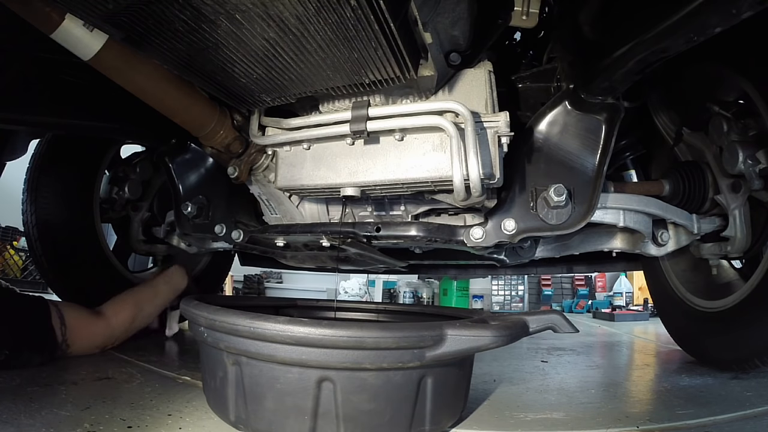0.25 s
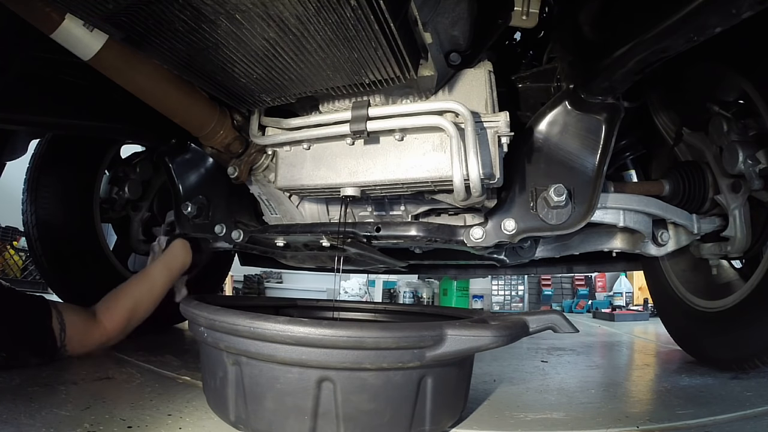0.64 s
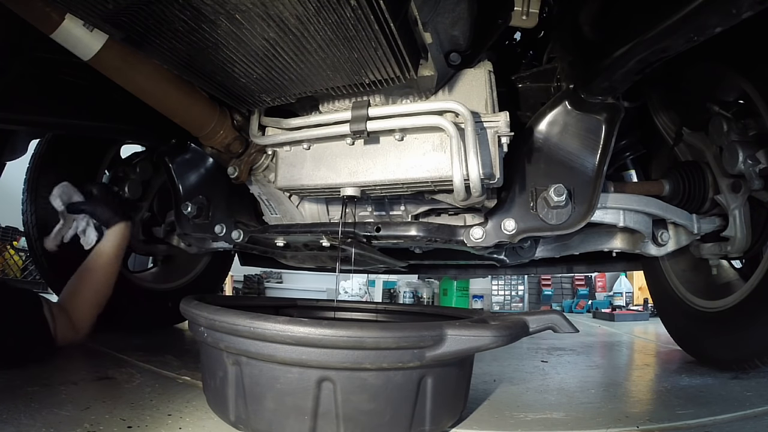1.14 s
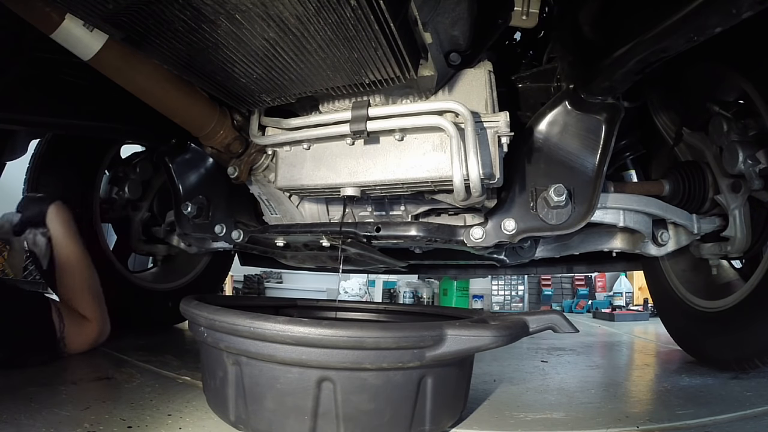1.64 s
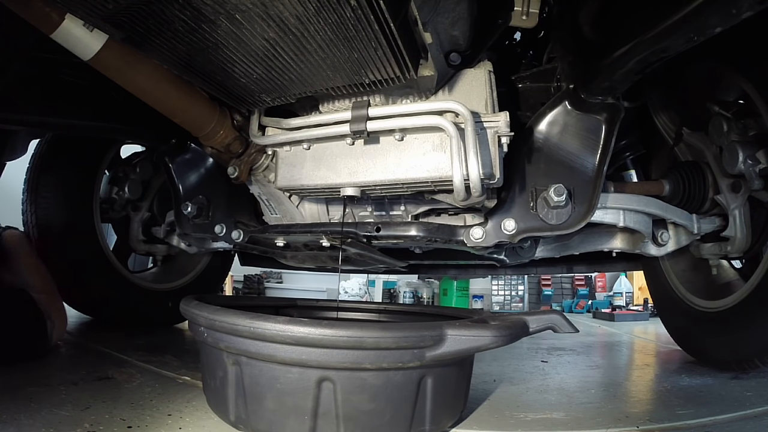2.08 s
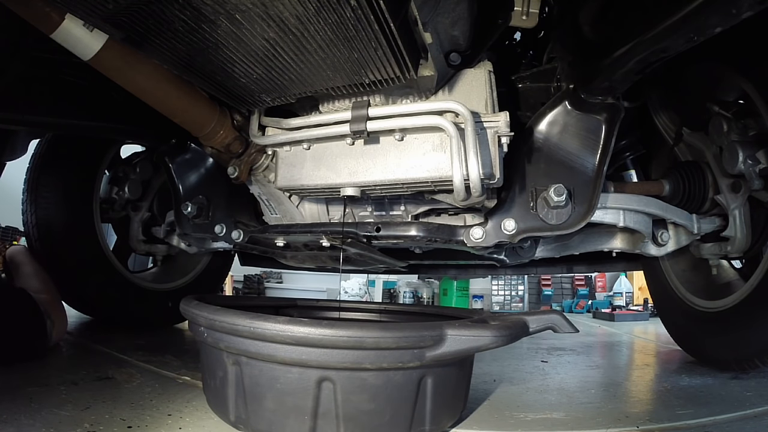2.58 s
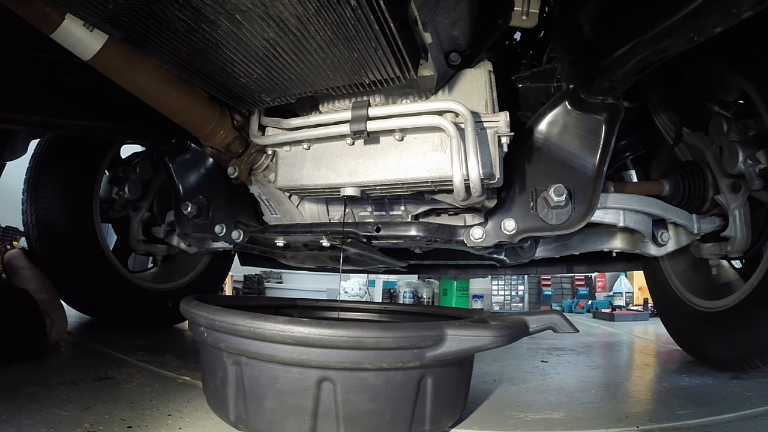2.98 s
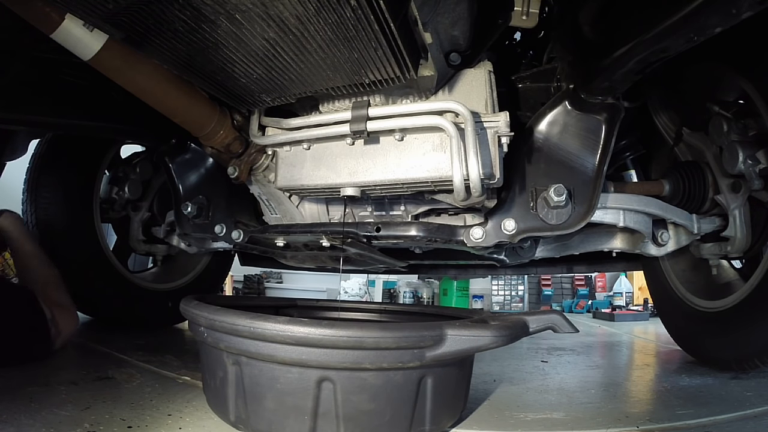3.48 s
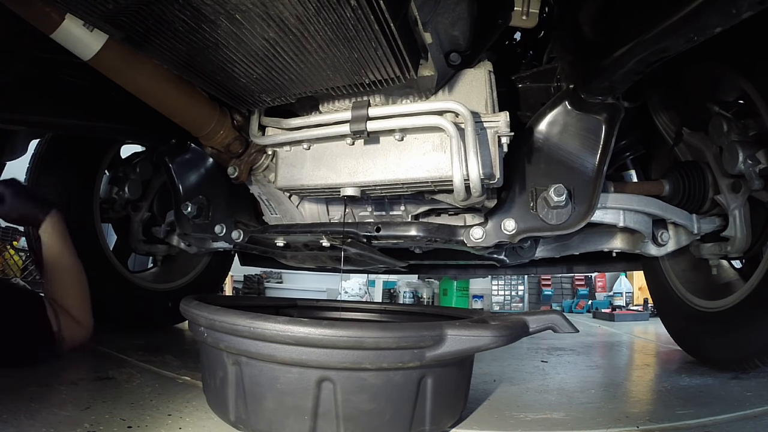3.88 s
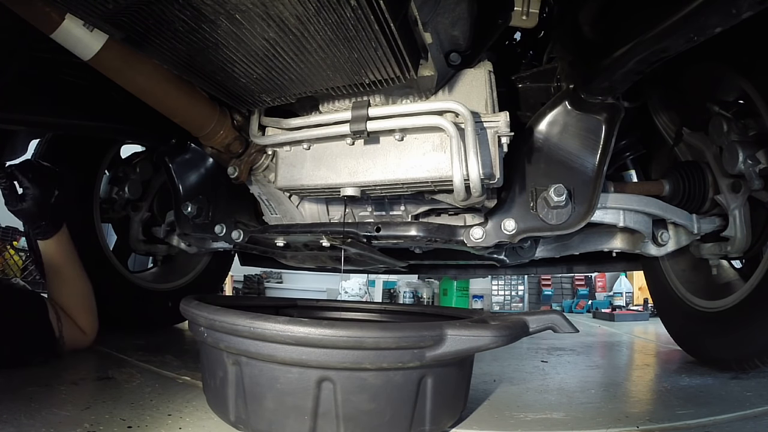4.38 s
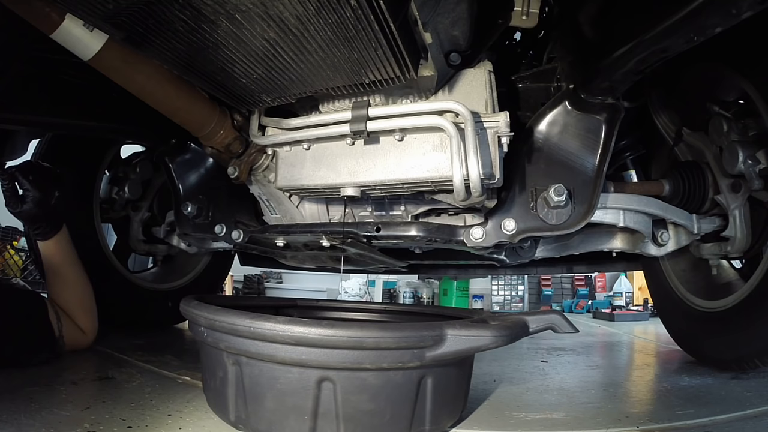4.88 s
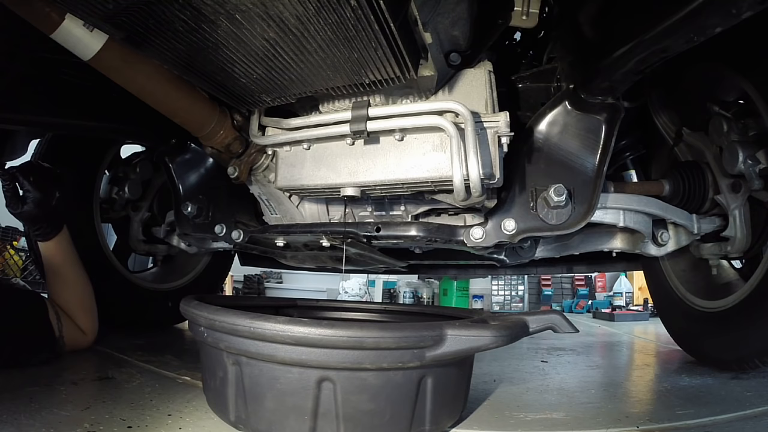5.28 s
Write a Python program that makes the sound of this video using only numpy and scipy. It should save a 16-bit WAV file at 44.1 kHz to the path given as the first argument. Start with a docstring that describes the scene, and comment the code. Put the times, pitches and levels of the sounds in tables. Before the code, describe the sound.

Close under a car, used oil runs in a thin stream into a plastic drain pan. It starts with sharp splats and plinks, thins briefly, then gurgles more, nearly dries to single drops around two seconds, and returns with hollow gulps. Low bumps and a muffled arm rub come mostly in the first second. Short boxy echo, quiet room air and uneven rumble; nearly centred.

```python
"""On a garage floor under a car, used engine oil runs from a sump into a plastic drain pan.
The thin stream swells and thins: swarms of decaying sine rings make its trapped bubbles gurgle and fizz.
Louder bubbles plink with rising pitch; drops splat as bursts of tiny rings over filtered noise.
The pan and underbody echo the oil. Someone moving makes low bumps and rubs over rumble and room air."""
import sys
import numpy as np
from scipy import signal
from scipy.fft import rfft, irfft
from scipy.io import wavfile

SR = 44100
rng = np.random.default_rng(int(sys.argv[2]) if len(sys.argv) > 2 else 0)


def store_wav(level_fs):
    """Save 16-bit WAV to argv[1]."""
    pcm = np.round(np.clip(np.atleast_2d(level_fs), -1, 1) * 32767)
    wavfile.write(sys.argv[1], SR, pcm.T.astype(np.int16))


N = 244002
TIME = np.arange(N) / SR


def undb(db):
    """Turn decibels into a gain to multiply by."""
    return 10 ** (np.asarray(db) / 20)


def unit(x):
    """Scale a signal so that its average strength (rms) is 1."""
    return x / np.sqrt(np.mean(x ** 2) + 1e-18)


def curve(table, t, axis=1):
    """Read one column of a table at times t, with straight lines between its rows."""
    rows = np.array(table)
    return np.interp(t, rows[:, 0], rows[:, axis])


def fade(t, t60):
    """Die away smoothly, 60 dB down after t60 seconds (at least 1 ms)."""
    return np.exp(-np.log(1000) * t / max(t60, 1e-3))


def opening(t, rise_s):
    """Rise smoothly from silence; rise_s sets how fast."""
    return 1 - np.exp(-t / rise_s)


def add(out, s, sound):
    """Mix a sound in, starting at s seconds."""
    i = int(np.clip(s * SR, 0, len(out) - 1))
    out[i:i + len(sound)] += sound[:len(out) - i]


def spaced(k, jitter, count):
    """Time in seconds of event k: evenly shared slots, with a random place inside each."""
    return (k + jitter) / count * N / SR


def colour(x, points):
    """Filter by an (f/Hz, level/dB) outline, scaled so that white noise keeps its power."""
    hz, db = np.transpose(points)
    bins = np.maximum(np.arange(len(x) // 2 + 1) * SR / len(x), 1)
    outline_db = np.interp(np.log(bins), np.log(hz), db)
    return irfft(rfft(x) * unit(undb(outline_db)), len(x))


def bubble(hz, t60, glide, swell):
    """A ring that opens over about swell cycles and fades; its pitch climbs by the share glide in t60."""
    t = TIME[:int(SR * t60) + 8]
    pitch = np.minimum(hz * (1 + glide * t / t60), SR / 2)
    wave = np.sin(2 * np.pi * np.cumsum(pitch) / SR)
    return wave * fade(t, t60) * opening(t, swell / hz)


# how strongly the stream runs, before each layer's gain: t/s, bubbling level/dB, fine spray level/dB
STREAM_FLOW = [(0.0, -48, -54), (.08, -58, -59.5), (0.15, -57.5, -61), (0.42, -60.5, -69),
               (.52, -62, -61.5), (.62, -60.5, -75), (0.75, -59, -60), (.85, -55.5, -65.5),
               (1.28, -56, -62), (1.46, -51, -55.5), (1.6, -56, -63.5), (1.71, -54, -59.5),
               (1.85, -57, -65), (2.06, -62, -66), (2.4, -60, -84), (2.76, -62.5, -78), (2.85, -55, -61.5),
               (3.03, -55, -59.5), (3.39, -54.5, -61.5), (3.74, -53, -59), (4.02, -53.5, -63.5),
               (4.26, -57.5, -63), (4.44, -52, -63), (4.68, -56.5, -67), (4.95, -56.5, -68),
               (5.2, -53, -65.5), (5.53, -54.5, -68)]
# starting pitch of the largest bubbles: t/s, f/Hz
LARGEST_BUBBLE = [(0, 1570), (.9, 1072), (1.45, 1310), (2.3, 1458), (2.95, 1140), (3.4, 1200), (4.2, 1414),
                  (4.8, 1548), (5.53, 1770)]


def trickle(count=3200, octaves=2.0, crowding=0.901, tilt_db=1.0, scatter_db=5.0, cycles=44,
            glide=0.041, gain_db=-4, swell=0.16):
    """The stream drags under a swarm of bubbles, from the largest size to smaller, higher ones."""
    out = np.zeros(N)
    when, size, strength, damping = rng.random((count, 4)).T
    times = spaced(np.arange(count), when, count)
    above = octaves * size ** crowding  # octaves over the largest bubble
    pitches = curve(LARGEST_BUBBLE, times) * 2 ** above
    gains = undb(tilt_db * above - scatter_db * np.log(strength + 0.055))
    decays = cycles * (.5 + damping) / pitches
    for s, hz, gain, t60 in zip(times, pitches, gains, decays):
        add(out, s, gain * bubble(hz, t60, glide, swell))
    return unit(out) * undb(curve(STREAM_FLOW, TIME) + gain_db)


FULL_FLOW_DB = -50  # reference bubbling level for a full stream


def churn(count=420, octaves=0.463, lowest=1.0, scatter_db=3, cycles=46, glide=0.072, swell=0.35,
          gain_db=-6, steepness=1.94):
    """Where the stream plunges in, big bubbles of similar size overlap; more flow makes them much louder."""
    out = np.zeros(N)
    for k, (when, size, strength) in enumerate(rng.random((count, 3))):
        s = spaced(k, when, count)
        hz = curve(LARGEST_BUBBLE, s) * lowest * 2 ** (octaves * size)
        gain = undb(-scatter_db * np.log(strength + 0.014))
        add(out, s, gain * bubble(hz, cycles / hz, glide, swell))
    flow_db = curve(STREAM_FLOW, TIME) - FULL_FLOW_DB
    return unit(out) * undb(FULL_FLOW_DB + gain_db + steepness * flow_db)  # steepness: dB per dB of flow


# gulps of a few like-sized bubbles, level before gain: t/s, middle f/Hz, level/dB, length/s
GULP_TIMES = [(1.11, 1210, -54, .05), (1.55, 1490, -49, .05), (1.715, 1280, -50.5, .04),
              (2.865, 1286, -52, .025), (2.918, 1243, -49, .06), (3.036, 1470, -50, .02),
              (3.095, 1500, -48.5, .06), (3.215, 1344, -44.5, .075), (3.325, 1120, -54.5, .02),
              (3.38, 1276, -46, .05), (3.43, 1396, -47, .05), (3.52, 1440, -51, .06),
              (3.635, 1540, -46.5, .06), (3.72, 1740, -50, .03), (3.77, 1310, -50, .05),
              (3.85, 1380, -50, .045), (4.18, 1510, -50, .04), (4.675, 1660, -53, .025),
              (4.865, 1665, -48.5, .035), (5.43, 1675, -49.5, .03)]


def gulps(count=6, gain_db=1.0, octaves=0.13, cycles=56, glide=0.043, swell=0.54):
    """The stream drags under bubbles in quick succession; they overlap into a short hollow gurgle."""
    out = np.zeros(N)
    for s, hz, db, length in GULP_TIMES:
        for k, (when, size) in enumerate(rng.random((count, 2))):
            pitch = hz * 2 ** (octaves * (size - .5))
            ring = bubble(pitch, cycles / pitch, glide, swell)
            add(out, s + length * (k + when) / count, undb(db + gain_db) * ring)
    return out


# small bubbles die sooner: fade time at a reference pitch, and the power of pitch by which it shortens
RING_T60_S, RING_HZ, RING_FALL = 0.035, 2000, 0.89
SLAP_DB, SLAP_T60_S, SLAP_OCTAVES = -16.5, .035, .27  # slap level before its fade; pitch spread each way


def plink(hz, glide=0.26, swell=0.2, slap_rise_s=0.000076,
          count=2, satellite_db=-18, satellite_s=.02, satellite_low=0.76, satellite_octaves=0.68):
    """A bubble quickly damped by the thick oil, born in a short wet slap and shedding weaker satellites."""
    def ring(f):
        """Let one bubble ring; the higher its pitch, the shorter it lasts."""
        return bubble(f, RING_T60_S * (RING_HZ / f) ** RING_FALL, glide, swell)

    t = TIME[:SR // 12]
    spread = 2 ** SLAP_OCTAVES
    band = [(hz / 8, -44), (hz / spread, -5), (hz, 0), (hz * spread, -8), (hz * 8, -44)]
    slap = colour(rng.standard_normal(len(t)), band)
    out = undb(SLAP_DB) * slap * fade(t, SLAP_T60_S) * opening(t, slap_rise_s)
    add(out, 0, ring(hz))
    for when, smallness in rng.random((count, 2)):
        satellite_hz = hz * satellite_low * 2 ** (satellite_octaves * smallness)
        add(out, when * satellite_s, undb(satellite_db) * ring(satellite_hz))
    return out


# the loudest single bubbles, level before gain: t/s, starting f/Hz, level/dB
LOUD_BUBBLES = [(0.1557, 6090, -30), (0.157, 5200, -37), (0.1914, 4930, -43.5), (0.233, 3770, -49),
                (0.236, 1470, -50), (.249, 2320, -48), (0.298, 1810, -38), (0.323, 1850, -50),
                (.354, 5270, -46.5), (0.3625, 2000, -45), (.501, 1456, -52), (0.682, 5440, -41.5),
                (0.783, 1760, -49), (0.8136, 1210, -43.5), (0.866, 2275, -41), (0.868, 1105, -46),
                (0.876, 5330, -42), (0.946, 1110, -46.5), (0.957, 1100, -43), (0.969, 4140, -40),
                (0.9983, 3980, -41.5), (1.078, 1610, -43.5), (1.092, 3250, -43), (1.0964, 1830, -44),
                (1.157, 2010, -40.5), (1.189, 3016, -37), (1.193, 3170, -38), (1.234, 1325, -41.5),
                (1.2338, 3750, -36), (1.234, 3270, -42), (1.263, 2010, -45), (1.293, 1820, -37),
                (1.348, 1766, -39), (1.362, 2080, -41), (1.377, 1270, -46), (1.435, 1370, -37.5),
                (1.456, 1406, -39.5), (1.44, 2160, -47), (1.478, 1480, -47), (1.488, 5180, -43.5),
                (1.498, 1920, -48), (1.517, 3450, -46), (1.589, 990, -49.5), (1.602, 1420, -48.5),
                (1.646, 1415, -45), (1.649, 2110, -46), (1.675, 2180, -38.5), (1.712, 3500, -48),
                (1.714, 4080, -42.5), (1.731, 2140, -50), (1.7729, 3660, -42), (1.853, 12600, -46),
                (1.866, 1250, -48), (1.894, 3780, -48.5), (1.919, 2350, -48), (1.928, 906, -50),
                (1.9826, 2100, -46), (2.017, 1675, -45), (2.19, 2067, -37.5), (2.205, 2050, -42),
                (2.341, 1860, -48), (2.4557, 2935, -37), (2.558, 13100, -45), (2.5675, 7230, -36.5),
                (2.568, 3600, -43), (2.575, 2490, -39), (2.61, 1605, -46), (2.611, 2020, -45),
                (2.8412, 2280, -43.5), (2.85, 5720, -33.5), (2.8667, 2210, -46), (2.8914, 4020, -46),
                (2.954, 1128, -46), (3.026, 2390, -42), (3.087, 4120, -44), (3.064, 5700, -40),
                (3.167, 2200, -50.5), (3.191, 5050, -42), (3.192, 3250, -44.5), (3.211, 2450, -44.5),
                (3.228, 5330, -40), (3.31, 5420, -41.5), (3.432, 3190, -52), (3.4568, 2300, -42.5),
                (3.492, 1420, -42.5), (3.492, 2130, -48), (3.578, 2290, -48), (3.607, 2980, -48),
                (3.641, 5320, -42.5), (3.693, 3070, -44), (3.723, 3780, -44.5), (3.767, 3080, -45),
                (3.789, 5640, -35.5), (3.855, 11900, -45.5), (3.8659, 2054, -46), (3.8854, 1430, -46),
                (3.9727, 1870, -42), (3.995, 3160, -42), (4.041, 2170, -49), (4.079, 2500, -44.5),
                (4.0978, 1474, -44.5), (4.214, 5420, -42.5), (4.334, 1890, -47.5), (4.378, 1625, -43.5),
                (4.401, 2410, -41), (4.418, 1490, -46), (4.43, 3370, -44), (4.443, 1710, -42.5),
                (4.6103, 1950, -39.5), (4.635, 5430, -45), (4.741, 1626, -49), (4.7773, 1960, -48),
                (4.805, 2400, -47), (4.819, 3150, -50.5), (4.958, 5820, -45.5), (5.0305, 1680, -43.5),
                (5.0315, 2004, -36), (5.1, 1900, -42.5), (5.118, 5660, -46), (5.1576, 1900, -43),
                (5.169, 6050, -51), (5.2116, 2046, -43.5), (5.259, 2220, -32), (5.291, 2520, -44),
                (5.294, 5760, -45), (5.3214, 3280, -45), (5.355, 2540, -45.5), (5.357, 3850, -52),
                (5.392, 5400, -46.5), (5.44, 3330, -44), (5.497, 2025, -42)]


def plinks(gain_db=4):
    """Single ringing bubbles stand out from the stream."""
    out = np.zeros(N)
    for s, hz, db in LOUD_BUBBLES:
        add(out, s, undb(db + gain_db) * plink(hz))
    return out


def patter(count=150, over_stream_db=2, spread_db=5, octaves=1.5, tilt_db=-2):
    """Lesser plinks fall at random, louder with the flow; each main ring is at or above the largest bubble."""
    out = np.zeros(N)
    for k, (when, smallness, strength) in enumerate(rng.random((count, 3))):
        s, above = spaced(k, when, count), octaves * smallness
        db = curve(STREAM_FLOW, s) + over_stream_db + spread_db * (strength - .5) + tilt_db * above
        add(out, s, undb(db) * plink(curve(LARGEST_BUBBLE, s) * 2 ** above))
    return out


# drops smacking the oil, levels before gains and filters:
# t/s, level/dB, low smack against spray level/dB, fade time t60/s
DROP_HITS = [(0.113, -44, -3, 0.04), (0.1542, -43, -18, 0.13), (0.23, -42.5, -1, 0.027),
             (0.2871, -44, 0, 0.17), (0.2977, -38, 4, 0.046), (0.315, -46.5, -1, 0.085),
             (0.405, -46, -18, 0.039), (0.533, -52, -1, 0.14), (.785, -39, 1.5, 0.09),
             (0.793, -47, -8, 0.081), (0.825, -50.5, 4.5, 0.18), (0.867, -62, 16, 0.045),
             (.957, -60.5, 19, 0.1), (1.078, -49.5, 9, 0.13), (1.177, -49, 16.5, 0.016),
             (1.336, -41, -21, 0.049), (1.354, -38.5, -25, 0.065), (1.4918, -48.5, 7, 0.089),
             (1.597, -51, -25, 0.11), (1.683, -45, 6, 0.048), (1.719, -36.5, -4, 0.026),
             (1.758, -47.5, -18, 0.033), (1.972, -53, -14, 0.063), (2.19, -65, 15, 0.04),
             (2.454, -54, 10, 0.036), (2.567, -41, -3.5, 0.11), (2.601, -43, -3, 0.16),
             (2.8383, -37.5, -9, 0.018), (3.012, -55, 7, 0.095), (3.055, -46, 3, 0.028),
             (3.086, -65, 20, 0.074), (3.177, -47.5, 4.5, 0.12), (3.309, -65, -13, 0.05),
             (3.43, -51, 9, 0.088), (3.4815, -45.5, -12, 0.051), (3.6386, -51, 7, 0.049),
             (3.68, -53, 12.5, 0.065), (3.804, -51, 4, 0.094), (3.824, -45, -11, 0.038),
             (3.867, -53, 12.5, 0.049), (4.3863, -49, 2, 0.057), (4.635, -60, 20, 0.025),
             (5.032, -60, 22, 0.028), (5.438, -55, -4, 0.09)]
# tone of the spray, relative: f/Hz, level/dB (per Hz)
SPRAY_TONE = [(1500,-42),(3500,-10),(5500,1),(7300,4),(9000,2.5),(12500,-4),(15000,-10)]
# tone of the duller smack, relative: f/Hz, level/dB (per Hz)
SMACK_TONE = [(600,-42),(1200,-22),(2000,-16),(3800,-14),(6000,-41)]
MIST_DB, MIST_T60_S = -6, .14  # mist start against the drop's level, before the spray filter; fade time


def splats(spray_db=-8, smack_db=-6, rise_s=0.0002, low_hz=3800, high_hz=14000, cycles=38,
           glide=0.0097, swell=0.12, count=26):
    """Drops tear the oil film into tiny bubbles; a dull noise smack and soft noise mist start with them."""
    spray, smack = np.zeros(N), np.zeros(N)
    t = TIME[:SR // 8]
    for s, db, body_db, t60 in DROP_HITS:
        blow = undb(db) * fade(t, t60) * opening(t, rise_s)
        burst = np.zeros(len(t))
        for k, (when, smallness) in enumerate(rng.random((count, 2))):
            hz = low_hz * (high_hz / low_hz) ** ((k + smallness) / count)
            delay = when * t60 / 2  # the bubbles weaken as the film settles
            add(burst, delay, fade(delay, t60) * bubble(hz, cycles / hz, glide, swell))
        add(spray, s, unit(burst) * np.sqrt(np.mean(blow ** 2)))
        mist = rng.standard_normal(len(t)) * fade(t, MIST_T60_S) * opening(t, rise_s)
        add(spray, s, undb(db + MIST_DB) * mist)
        add(smack, s, rng.standard_normal(len(t)) * blow * undb(body_db))
    return undb(spray_db) * colour(spray, SPRAY_TONE) + undb(smack_db) * colour(smack, SMACK_TONE)


# tone filter for the tiniest bubbles, relative: f/Hz, level/dB
FOAM_TONE = [(3500,9),(5000,-2.5),(5700,6),(7300,-0.5),(8500,3),(12500,-2),(15000,-2)]


def fizz(count=5500, size=12, low_hz=4300, high_hz=14500, tilt_db=-4.0, brightening=0.26, scatter_db=1.0,
         cluster_db=3.0, cycles=42, glide=0.022, gain_db=-2):
    """The tiniest bubbles ping high, in clusters of shared loudness; the fuller the stream, the brighter."""
    out = np.zeros(N)
    clusters = np.clip(rng.standard_normal(count // size + 1), -2, 2)
    when, smallness, strength = rng.random((count, 3)).T
    times = spaced(np.arange(count), when, count)
    pitches = low_hz * (high_hz / low_hz) ** smallness
    tilt = tilt_db + brightening * (curve(STREAM_FLOW, times) - FULL_FLOW_DB)
    cluster_levels = cluster_db * clusters[np.arange(count) // size]
    levels = smallness * tilt + cluster_levels - scatter_db * np.log(strength + 0.1)
    for s, hz, db in zip(times, pitches, levels):
        add(out, s, undb(db) * bubble(hz, cycles / hz, glide, 0.17))
    return unit(colour(out, FOAM_TONE)) * undb(curve(STREAM_FLOW, TIME, axis=2) + gain_db)


# where the sump's echo mostly weakens the sound (one row lifts it slightly): f/Hz, width/Hz, level/dB
ECHO_DIPS = [(1288, 68, -7), (1610, 68, -1), (2015, 60, -8), (2950, 380, -1.5), (3500, 35, -14),
             (5630, 98, -12), (5900, 170, -15), (6310, 91, -25), (7190, 200, 1), (8420, 690, -2.5)]


def cancel(x):
    """The sump's echo meets the direct sound and changes narrow bands, nearly all of them dips."""
    for hz, width, db in ECHO_DIPS:
        band = signal.lfilter(*signal.iirpeak(hz, hz / width, fs=SR), x)
        x = x - (1 - undb(db)) * band
    return x


# air resonances between pan and underbody, before treble damping and gain: f/Hz, fade time t60/s, level/dB
CAVITY_RINGS = [(995,.1,-10),(1138,.12,-6),(1338,.2,1),(1387,.2,-8),(1455,.15,-4),(1504,.12,0),(1689,.17,0),(1757,.2,-7),(1837,.17,-3),(1937,.15,1),(2185,.08,2),(2375,.12,-7),(2468,.1,-1),(2555,.08,-3),(2959,.12,-2),(3097,.14,-2),(3263,.06,0),(3400,.06,-2),(3570,.09,-6),(4000,.04,-4),(4190,.06,-6),(4380,.06,-3),(5215,.08,-6),(5331,.07,2),(5690,.06,-1),(6090,.04,-2),(6384,.07,-4),(6760,.04,-5),(7450,.05,-3),(7770,.04,-5),(7990,.06,-2),(9060,.02,-3),(10560,.02,-2),(12280,.02,-1),(13150,.05,-1)]
# bouncing between oil, pan wall and sump: round trip t/s, share sent back (0-1, before the limit below)
BOUNCE_TRIPS = [(.0005, 0.47), (.0016, 0.68)]
MOST_SENT_BACK = .66
WALL_ECHO_S, WALL_ECHO_DB = .0125, -13  # one echo from a nearby wall
# scattered echoes under the car and far off in the garage: level before filter and delayed start, fade time
NEAR_TAIL_DB, NEAR_TAIL_T60_S = -12, .1
FAR_TAIL_DB, FAR_TAIL_T60_S = -17, .42


def under_car(x, ring_db=1, side_db=-14, absorb_hz=3600):
    """Bounces, a wall echo, air resonances and scattered echoes surround the oil; returns mid and side."""
    t = TIME[:SR // 2]
    response = 1. * (t == 0)  # the direct sound
    add(response, WALL_ECHO_S, undb(WALL_ECHO_DB) * np.ones(2) / 2)
    for hz, t60, db in CAVITY_RINGS:
        ring = fade(t, t60 * min(1, absorb_hz / hz))  # treble resonances die sooner
        response += undb(db + ring_db) * 2 * ring / ring.sum() * np.cos(2 * np.pi * hz * t)

    # the bounces smear sound in time without changing its tone
    spectrum = rfft(cancel(response))
    bins = np.arange(len(t) // 2 + 1) * SR / len(t)
    for trip_s, share in BOUNCE_TRIPS:
        late = np.exp(-2j * np.pi * bins * trip_s)
        back = min(share, MOST_SENT_BACK)
        spectrum = spectrum * (back + late) / (1 + back * late)

    near, far = rng.standard_normal((2, 2, len(t)))
    far = signal.sosfilt(signal.butter(2, absorb_hz, fs=SR, output="sos"), far)  # duller far off
    near_tail = undb(NEAR_TAIL_DB) * near * unit(fade(t, NEAR_TAIL_T60_S))
    far_tail = undb(FAR_TAIL_DB) * far * unit(fade(t, FAR_TAIL_T60_S))
    scatter, across = (near_tail + far_tail) * (t > .004) / np.sqrt(len(t))
    side = undb(side_db) * across / np.sqrt(np.sum(across ** 2))
    mid = irfft(spectrum, len(t)) + scatter
    return signal.fftconvolve(x, mid)[:N], signal.fftconvolve(x, side)[:N]


# soft bumps, level before gain and filter: t/s, f/Hz, level/dB, fade time t60/s
SOFT_BUMPS = [(0.25, 53, -44, 0.21), (0.316, 49, -41.5, 0.17), (0.361, 71, -32.5, 0.047),
              (0.589, 60.6, -35.5, 0.095), (0.84, 118.6, -27, 0.039), (0.863, 200, -36.5, 0.042),
              (0.85, 61.7, -23.5, 0.047), (0.87, 132, -30.5, 0.057), (0.909, 207, -33, 0.021),
              (0.916, 82, -26.5, 0.029), (1.11, 46, -37, 0.16), (1.308, 60.8, -40, 0.17),
              (1.506, 61, -40, 0.11), (2.334, 41.6, -26, 0.055), (2.627, 41.8, -38.5, 0.12),
              (3.121, 44.2, -29.5, 0.051), (3.249, 61, -22, 0.016), (4.377, 46.3, -39, 0.11)]
# tone filter for a soft contact, relative: f/Hz, level/dB
SOFT_TONE = [(170, 9.5), (240, 2.5), (400, 5), (1000, -67)]


def bumps(gain_db=1, swell=1.0):
    """Dull knocks from someone moving on the floor: low, fading rings of steady pitch."""
    out = np.zeros(N)
    for s, hz, db, t60 in SOFT_BUMPS:
        add(out, s, undb(db + gain_db) * bubble(hz, t60, 0, swell))
    return colour(out, SOFT_TONE)


# an arm rubs, catches and slips, level before each sound's fade: t/s, f/Hz, level/dB
ARM_SLIPS = [(.529, 270, -47), (.562, 370, -42.5), (.574, 265, -40.5), (.586, 320, -40.5), (.622, 320, -46),
             (.782, 260, -47)]
RUB_DB, RUB_T60_S = -9, .1  # friction noise against the knock, before its fade; fade time


def scuff(t60=0.05):
    """A muffled rub of an arm: each slip is a low knock in a little friction noise."""
    out, t = np.zeros(N), TIME[:SR // 8]
    for s, hz, db in ARM_SLIPS:
        band = [(hz / 2, -20), (hz, 0), (hz * 2, -30), (hz * 8, -80)]
        rub = colour(rng.standard_normal(len(t)), band)
        add(out, s, undb(db) * bubble(hz, t60, 0, 1.0))
        add(out, s, undb(db + RUB_DB) * rub * fade(t, RUB_T60_S) * opening(t, 1 / hz))
    return out


# tone of the garage air, relative: f/Hz, level/dB (per Hz)
AIR_TONE = [(94, -45), (160, 0.5), (355, -4.5), (455, -8), (550, -9), (1180, -14.5), (1450, -17),
            (1720, -21), (1930, -19.5), (2330, -20.5), (4120, -25.5), (5480, -32), (6380, -28.5),
            (15000, -58)]
AIR_DB = -56
# the uneven low rumble: t/s, deep part level/dB, upper part level/dB
RUMBLE_LEVEL = [(0, -45.5, -49.5), (.3, -35.5, -44.5), (.7, -49.5, -50.5), (.92, -36.5, -46),
                (1.65, -44, -50), (2.05, -39.5, -52), (3.25, -44, -44.5), (3.6, -50, -49),
                (5.53, -52.5, -45)]
# tone of the deep part, relative: f/Hz, level/dB (per Hz)
DEEP_TONE = [(12,-23.5),(22,9),(35,1),(55,0.5),(75,-6.5),(100,-47),(160,-90)]
# tone of the upper part, relative: f/Hz, level/dB (per Hz)
BOOM_TONE = [(45,-13),(75,-2.5),(95,-4),(115,-4),(138,-8),(160,-16),(205,-19),(260,-22.5),(400,-82)]


def garage():
    """Steady room air and a two-part low rumble of uneven level, all made of filtered noise."""
    air, deep, boom = rng.standard_normal((3, N))
    room_air = colour(air, AIR_TONE) * undb(AIR_DB)
    deep_rumble = colour(deep, DEEP_TONE) * undb(curve(RUMBLE_LEVEL, TIME))
    upper_rumble = colour(boom, BOOM_TONE) * undb(curve(RUMBLE_LEVEL, TIME, axis=2))
    return room_air + deep_rumble + upper_rumble


# tone filter for the left-right difference, relative: f/Hz, level/dB
WIDTH_TONE = [(30,-68),(100,-13),(250,-12),(500,9.5),(1000,12.5),(2500,6),(4500,23),(8000,14.5),(14000,24.5)]


def scene(oil_db=-4.5, air_side_db=-17):
    """The oil lands straight ahead, so both ears hear nearly the same; the spread favours the treble."""
    oil = plinks() + splats() + patter() + trickle() + churn() + gulps() + fizz()
    mid, side = under_car(undb(oil_db) * oil)
    mid = mid + bumps() + scuff() + garage()
    side_air = colour(rng.standard_normal(N), AIR_TONE) * undb(AIR_DB + air_side_db)
    side = colour(side + side_air, WIDTH_TONE)
    return np.array([mid + side, mid - side])  # left, right


TOP_HZ = 15100


def record(dry):
    """A steep low-pass filter removes the top of the treble, above TOP_HZ."""
    return signal.sosfilt(signal.ellip(10, .2, 80, TOP_HZ, fs=SR, output="sos"), dry)


dry = scene()
out = record(dry)
store_wav(out)
```